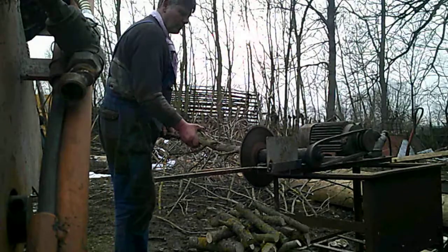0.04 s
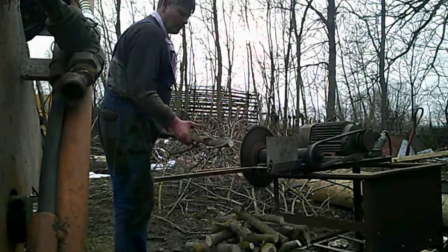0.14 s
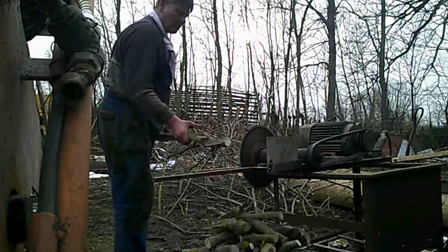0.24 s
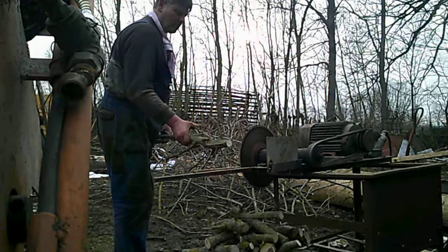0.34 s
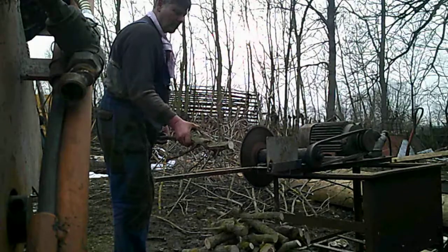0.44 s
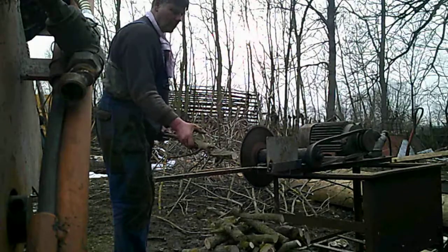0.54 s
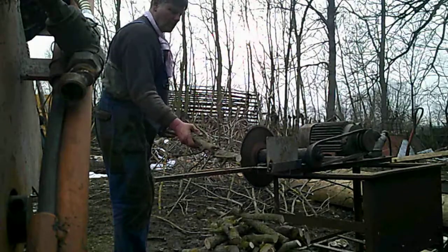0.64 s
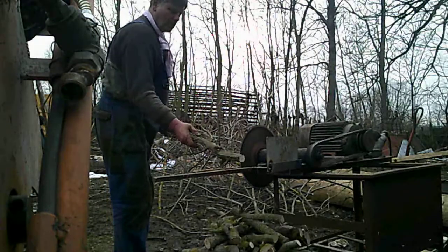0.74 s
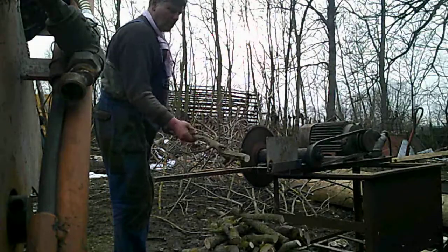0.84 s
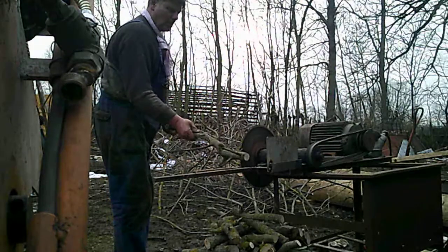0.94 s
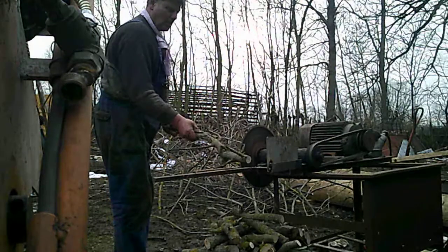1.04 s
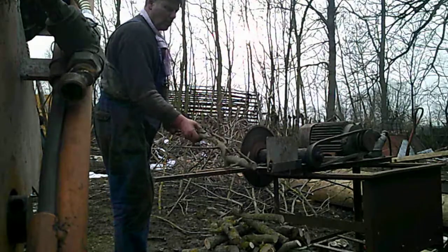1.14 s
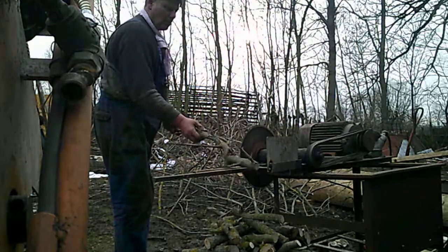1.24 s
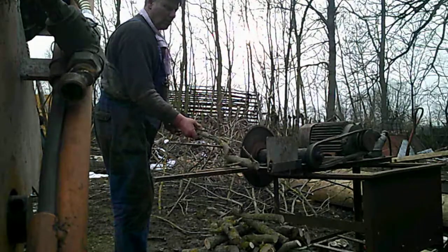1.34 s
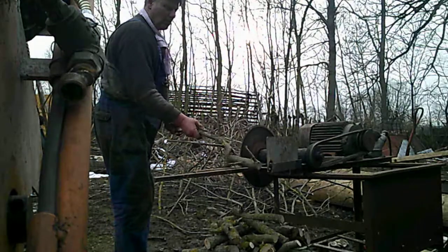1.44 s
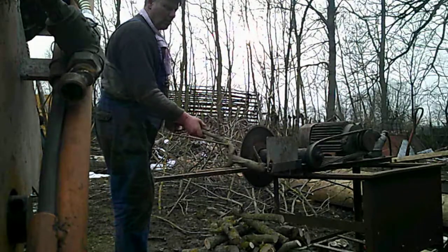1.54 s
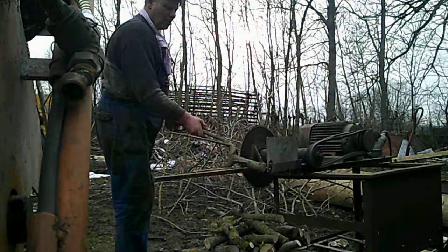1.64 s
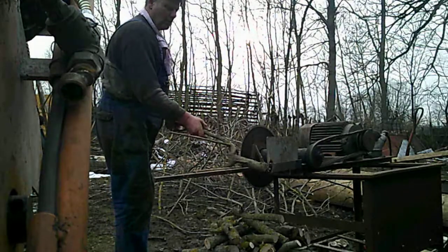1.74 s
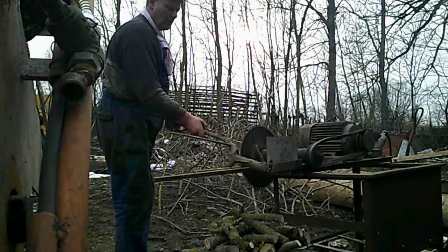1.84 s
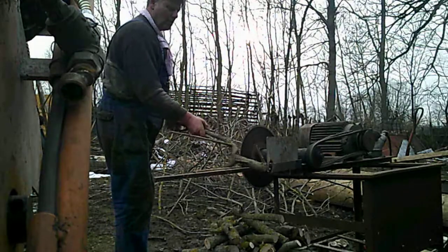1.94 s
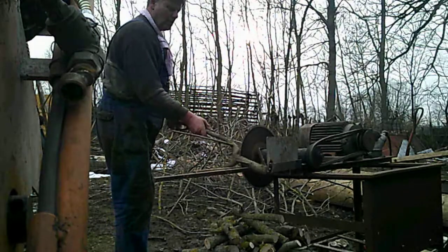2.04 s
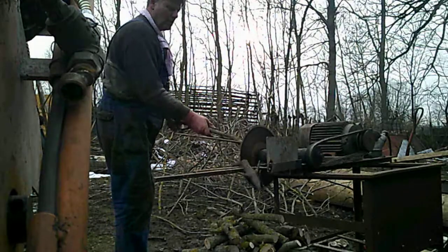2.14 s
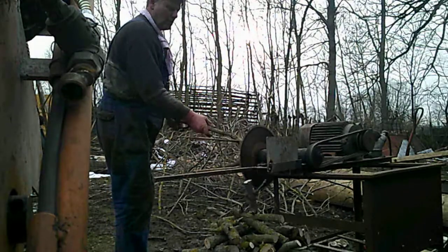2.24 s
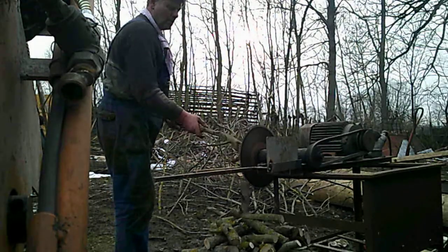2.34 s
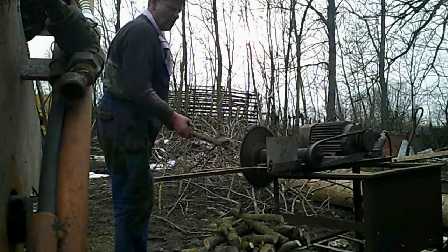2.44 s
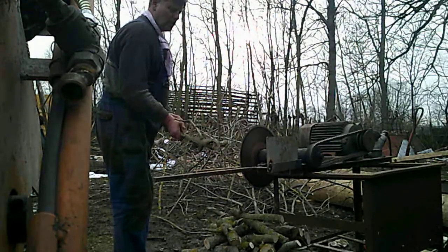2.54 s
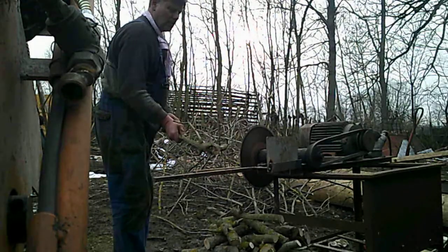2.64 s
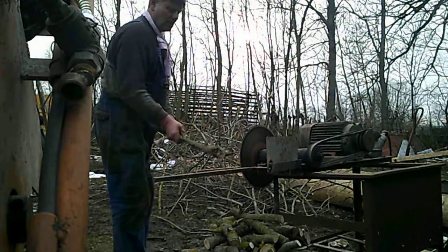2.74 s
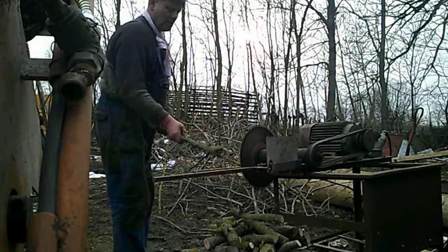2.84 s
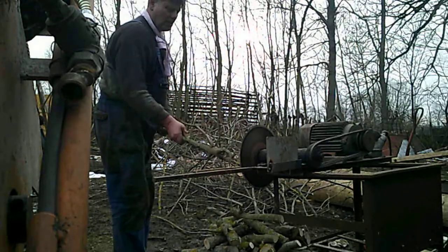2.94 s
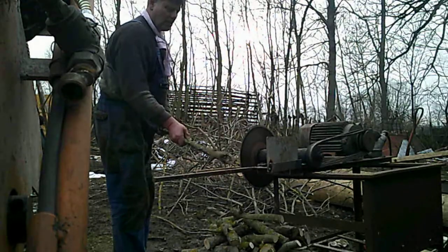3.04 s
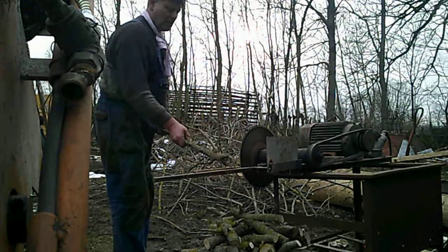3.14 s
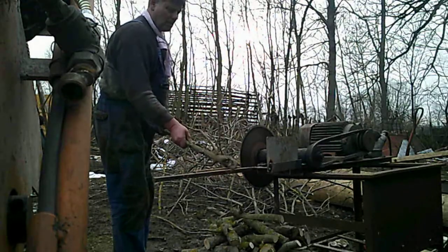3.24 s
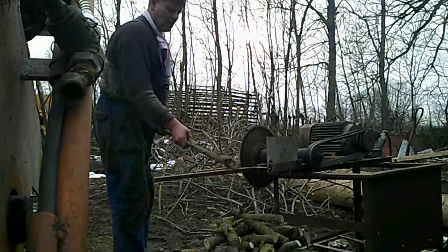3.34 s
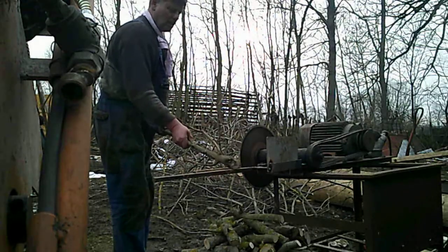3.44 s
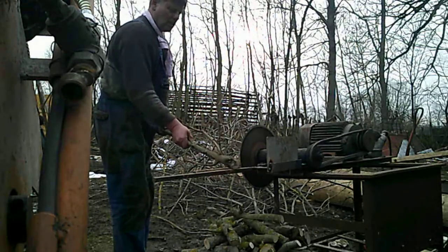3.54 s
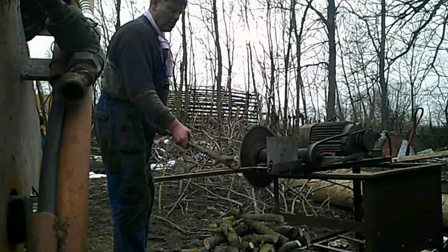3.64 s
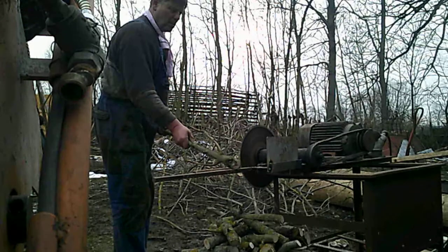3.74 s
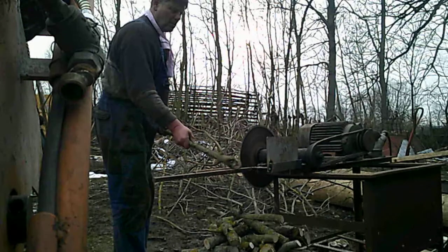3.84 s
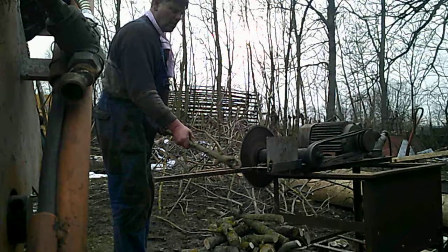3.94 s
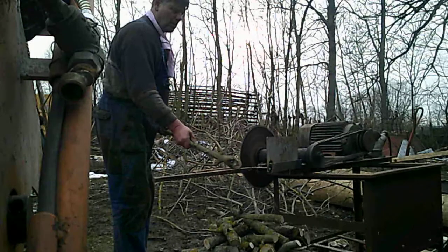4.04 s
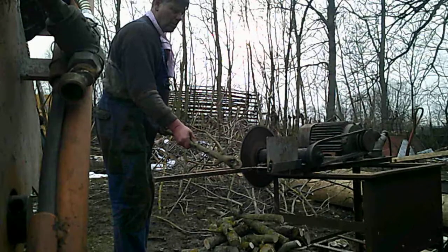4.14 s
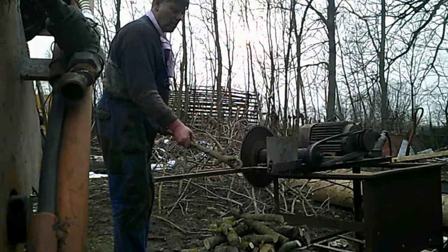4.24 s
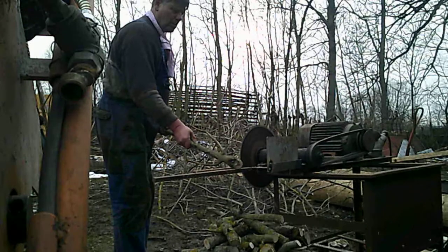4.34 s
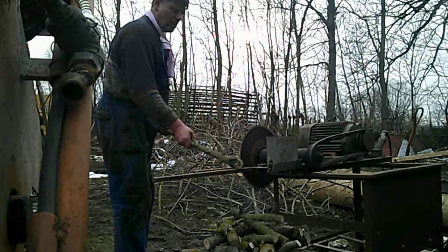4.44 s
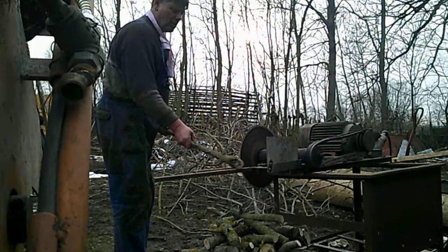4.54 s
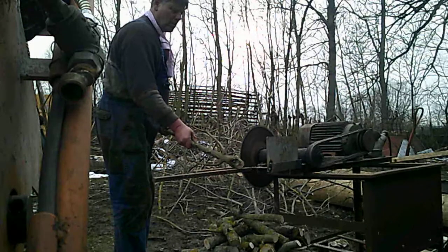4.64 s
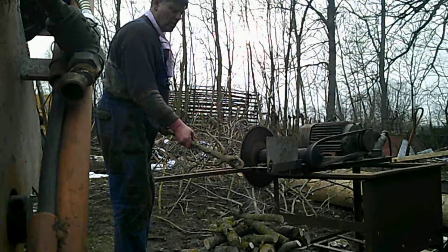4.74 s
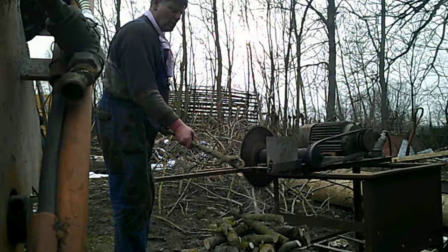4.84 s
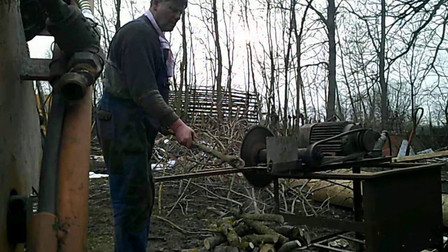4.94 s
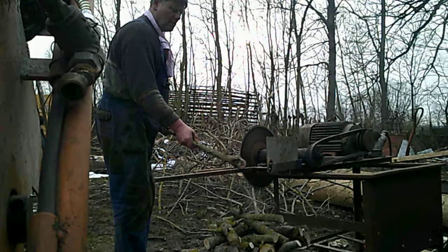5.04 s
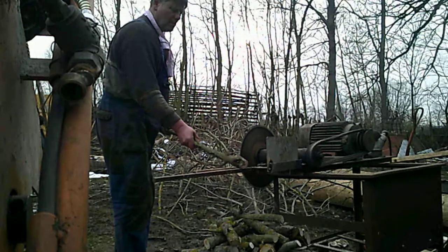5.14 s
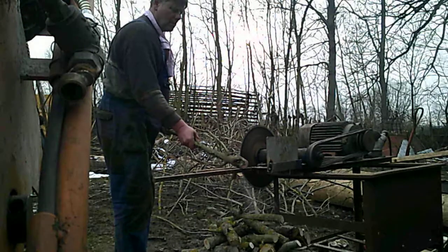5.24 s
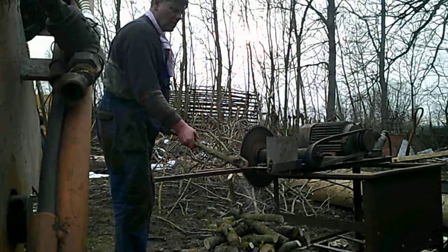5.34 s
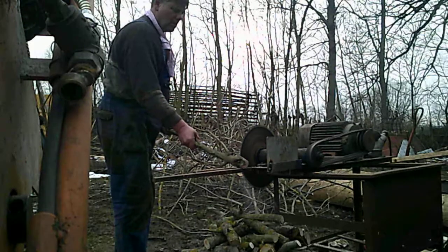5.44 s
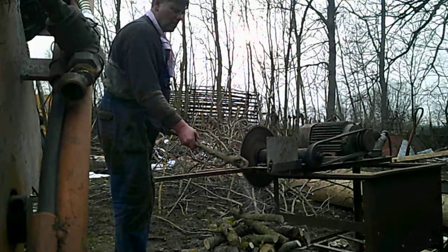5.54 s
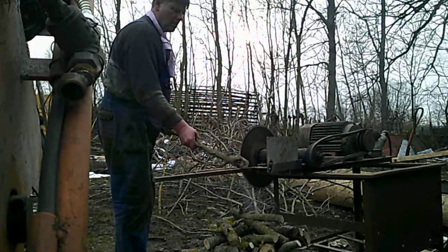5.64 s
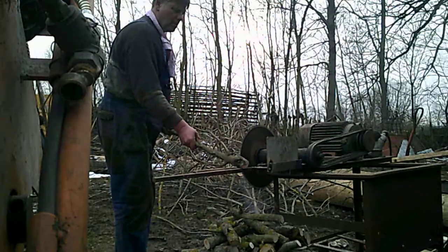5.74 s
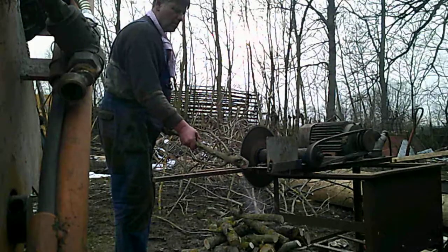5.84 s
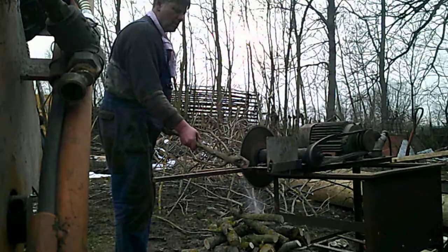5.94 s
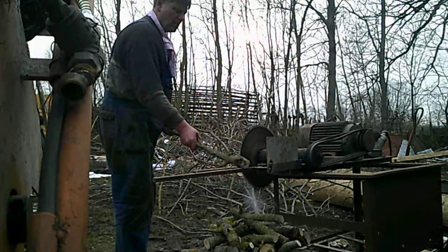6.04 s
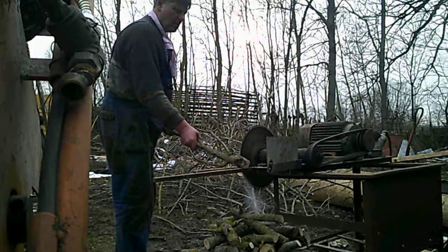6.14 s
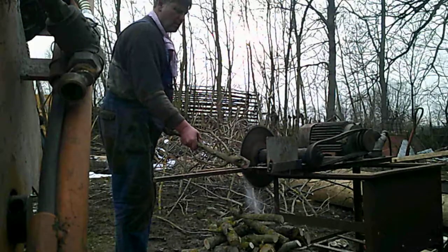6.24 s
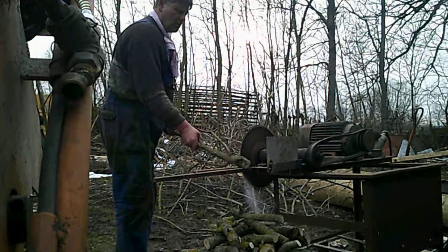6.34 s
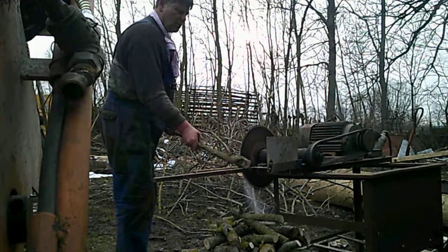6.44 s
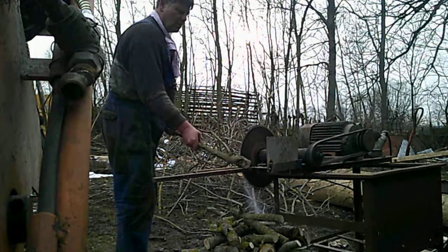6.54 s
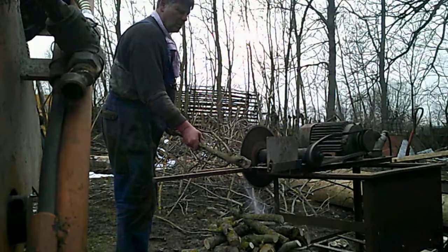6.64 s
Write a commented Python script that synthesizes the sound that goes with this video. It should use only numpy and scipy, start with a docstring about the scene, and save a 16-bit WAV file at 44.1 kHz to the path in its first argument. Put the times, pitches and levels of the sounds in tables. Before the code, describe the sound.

Outdoors, heard from a fixed spot nearby, a motor-driven saw blade spins with an airy whir above a soft rumble. A short cut through a thin branch gives a hollow tearing groan and a shriek, leaving a fading metallic ring. A second, much longer cut follows in thicker wood, buzzing and screeching in surges, with a thrumming steel bench and a fine rasp of chips, and is still going at the end.

```python
"""A homemade circular saw on an electric motor whirs in a yard, over a low outdoor rumble.
At 1.4 s it bites briefly into a thin branch, which groans: the uneven teeth strike the wood in a
pattern that repeats every turn, the blade screeches and the load slows the shaft a little.
The steel rings on over the whir. From 3.3 s to the end it works through a thick branch,
which damps the ring more and more as the blade sinks in."""
import sys
import numpy as np
from scipy import signal
from scipy.fft import rfft, irfft, next_fast_len
from scipy.io import wavfile
from scipy.ndimage import uniform_filter1d, map_coordinates

SR = 44100
rng = np.random.default_rng(int(sys.argv[2]) if len(sys.argv) > 2 else 0)


def output_pcm(signal):
    """Save a mono or channel-first signal as 16-bit PCM at the path in sys.argv[1].

    Samples are clipped to [-1, 1] before scaling.
    """
    pcm = np.clip(np.atleast_2d(signal).T, -1, 1) * 32767
    wavfile.write(sys.argv[1], SR, np.round(pcm).astype(np.int16))


N = 294347
T = np.arange(N) / SR

# tone of the yard's low bed: (frequency [Hz], relative level [dB])
RUMBLE_EQ = [(12, -15.5), (21, 4.5), (29, -0.5), (40, -11.5), (60, -8.5), (100, -16), (170, -18.5),
             (280, -30), (600, -44), (1500, -93.5)]
# tone of the air rushing past the teeth: (frequency [Hz], relative level [dB])
AIR_EQ = [(200, -19.5), (330, -17.5), (600, -14.5), (740, -11.5), (870, -3.5), (1150, -3), (1500, 0),
          (1800, -4.5), (2450, -22.5), (2670, -14), (2950, -15), (3300, -28), (3800, -34.5), (4250, -59)]
# narrow whistles of the running blade and motor: (frequency [Hz], width [Hz], relative level [dB])
WHINE_MODES = [(307, 10, -19), (438, 12, -9), (873, 18, -6), (985, 12, 3), (1105, 16, -4), (1217, 5, -1),
               (1341, 12, -3), (1431, 8, -1), (1500, 60, -5), (1662, 25, -10), (1946, 28, -6),
               (2062, 20, -15), (2186, 20, -12), (2358, 7, 1), (2406, 4, -3), (2460, 45, -14)]
# fader ride on the whir: (time [s], gain [dB])
WHIR_FADER = [(0, -41), (.35, -44.5), (1.35, -44.5), (2.5, -42.5), (3.2, -44), (6.67, -41.5)]
# shaft speed, sagging under load: (time [s], speed [turns/s])
SHAFT_SPEED = [(1.4, 29.65), (1.65, 29.24), (1.8, 29.22), (1.95, 28.91), (2.6, 29.65), (3.45, 29.64),
               (3.8, 29.45), (4.95, 29.38), (5.15, 29.25), (5.65, 29.23), (5.9, 28.94), (6.1, 28.91),
               (6.67, 28.45)]

# hollow tone of the wood: (frequency [Hz], width [Hz], relative level [dB])
WOOD_MODES = [(675, 46, -12.5), (836, 16, 0), (1020, 130, -4.5), (1266, 140, 3), (1307, 45, 12.5)]
# a branch hums when it bears firmly on the rim:
# (time [s], half length [s], multiple of shaft speed [x], level [dB])
WOOD_HUMS = [(1.494, 0.046, 8, -55.5), (1.865, 0.055, 8, -61), (3.57, 0.055, 15, -50.5),
             (3.702, 0.23, 8, -66), (4.97, 0.065, 8, -67.5), (5.85, .45, 8, -59), (6.096, 0.075, 15, -48),
             (6.148, .2, 22, -57), (6.58, 0.13, 11, -60)]
# tail length of the blade's dense, weak modes: (frequency [Hz], t60 [s])
SHIMMER_DECAY = [(400, .5), (1300, 0.92), (3000, 0.59), (3900, 0.89), (4600, 0.33), (5300, .42),
                 (6300, 0.51), (6800, 0.4), (7500, .25)]
# ring of the free blade: (frequency [Hz], relative level [dB], t60 [s])
RING_MODES = [(1136, -8, 1), (1157, -10, 1.5), (1194, -10, 1.2), (1217, 0, 2.8), (1324, -4, 1.6),
              (1443, -5, 2.4), (1602, -11, 1.8), (1900, -7, 2.2), (1954, -12, 1.8), (2051, -17, 2),
              (2358, 0, 2.8), (2406, -3, 2.5), (2476, -14, 1.6), (2893, -16, 1.2), (2950, -13, 1.1),
              (2972, -16, 1.1), (3268, -26, 1.3), (3424, -30, 1.3), (3833, -36, 1.3), (4012, -39, 1.2),
              (5570, -54, 1.6), (5880, -55, 1.5), (6280, -54, 1.6)]
# squeals of single blade modes: (time [s], half length [s], frequency [Hz], level [dB])
SQUEALS = [(1.505, 0.034, 2950, -37.5), (1.52, 0.04, 2400, -42), (3.686, 0.099, 2950, -43),
           (3.757, 0.065, 2360, -38.5), (5.134, 0.085, 2950, -45.5), (6.445, 0.076, 2405, -42.5)]

# mix of each cut at a normal bite: (start [s], end [s], screech gain [dB], shriek gain [dB],
# bench thrum gain [dB], chip rasp gain [dB], hollow wood gain [dB], tearing share [0-1])
CUT_MIX = [(1.409, 2.045, -38, -43.5, -48.5, -63, -40, 0.51),
           (3.298, 6.8, -42, -46.5, -48.5, -68.5, -55, 0.11)]
# how hard the wood is fed and the teeth scrape, a list per cut: (time [s], bite [dB], extra treble [dB])
FEED_RIDES = [
    [(1.4, -46, -4), (1.475, -26.5, 2.5), (1.57, -30.5, -1), (1.68, -38.5, 3), (1.79, -35.5, -5),
     (1.88, -37, 2), (1.975, -25.5, 5), (2.015, -21.5, -3.5), (2.06, -29, -12)],
    [(3.28, -39, -4.5), (3.34, -34, -0.5), (3.48, -37, 0), (3.68, -31.5, 1.5), (3.88, -36.5, 1.5),
     (4.03, -38.5, -0.5), (4.55, -34.5, -0.5), (4.83, -32.5, -0.5), (5.06, -33, -1.5), (5.12, -27.5, .5),
     (5.18, -32.5, 3.5), (5.36, -25, -1), (5.65, -32, 2.5), (5.8, -30.5, 0), (6.08, -38.5, 1.5),
     (6.27, -30.5, -4), (6.5, -37, 4), (6.67, -30.5, 2.5)],
]
# fibres tear more as the teeth start a fresh groove: (time [s], added tearing share [0-1])
FRESH_GROOVES = [(3.28, 0.3), (5.098, .3)]
# thrum of the steel bench: (frequency [Hz], width [Hz], relative level [dB])
BENCH_MODES = [(438.7, 18.2, -0.5), (473.7, 13, -2.5), (542, 19, -8), (669, 21, -7), (702, 36, -18),
               (789, 43, -9)]
# the wood-damped blade, from its low body through screech and shrill rim to its thinnest whistles,
# each: (frequency [Hz], width [Hz], relative level [dB])
BODY_MODES = [(860, 70, -20), (985, 30, -13), (1141, 22, -8), (1224, 35, -1), (1320, 40, 2), (1435, 22, 3),
              (1496, 25, -10), (1581, 20, 0), (1655, 25, -12)]
SCREECH_MODES = [(1897.4, 24, 0.5), (1966, 64, -1.5), (2088, 34, -5), (2158, 33, -10.5), (2367, 48, -6),
                 (2410, 22, 2.5), (2473, 58, -2), (2650, 120, -7.5), (2795, 170, -19)]
SHRIEK_MODES = [(2800, 70, -8), (2891, 35, -2), (2952, 40, 0), (3050, 70, -7), (3150, 90, -14),
                (3270, 70, -19), (3420, 22, -10), (3560, 110, -21), (3833, 16, -15), (3908, 16, -16),
                (4005, 25, -20)]
WHISTLE_MODES = [(4270, 22, -6.5), (4600, 39, -3), (5430, 52, -2), (5940, 190, -2.5), (6690, 50, -4),
                 (7500, 120, -0.5)]
# rasp of the flying chips: (frequency [Hz], relative level [dB])
CHIP_EQ = [(2500, -37), (3500, 1.5), (4000, -3), (4150, -4.5), (4900, -3.5), (5300, 3.5), (5950, 3.5),
           (6200, -2), (7150, 0.5), (7520, 6.5), (7850, -3.5), (8150, -6.5), (8550, -7), (8950, -33)]

GROAN_S, GROAN_WIDTH_S, GROAN_DB = 1.63, .075, -49.5
GROAN_HZ, GROAN_FALL_HZ_PER_S = 419, 335
RING_DB, BURIED_S, DAMPING_DB_PER_S = -10, 3.6, 5  # ring gain against the bite, and its late fade
NORMAL_BITE_DB = -33
ATTACK_S, RELEASE_S, GROOVE_SETTLE_S = 0.021, 0.041, 0.32
TREBLE_SLOPE, THRUM_SLOPE = 0.61, .1  # dB per dB of bite
SHRIEK_SLOPE, RASP_SLOPE = 0.94, 0.87  # dB per dB of screech
HIGH_CUT_HZ = 8950


def amp(db):
    """Decibels to gain."""
    return 10 ** (np.asarray(db) / 20)


def unit(x):
    """Scale to rms 1."""
    return x / np.sqrt(np.mean(x ** 2) + 1e-20)


def curves(rows):
    """An automation curve for each column after the time."""
    times, *columns = np.transpose(rows)
    return [np.interp(T, times, column) for column in columns]


def wobble(rate):
    """Smooth random modulation, rate knots a second."""
    return map_coordinates(rng.standard_normal(2048), [T * rate], mode="mirror")


def swell(peak_s, width_s):
    """A bell-shaped envelope peaking at 1."""
    return np.exp(-.5 * ((T - peak_s) / width_s) ** 2)


def filtered(x, response):
    """x through a complex frequency response."""
    size = next_fast_len(N + SR // 2)
    return irfft(rfft(x, size) * response(np.fft.rfftfreq(size, 1 / SR)), size)[:N]


def coloured(x, eq):
    """x through an EQ curve, at rms 1."""
    hz, db = np.transpose(eq)
    return unit(filtered(x, lambda f: amp(np.interp(np.log(f + 1), np.log(hz), db))))


def resonated(x, modes, low_hz, high_hz):
    """x through a resonator bank and a band-pass, at rms 1."""
    def response(f):
        peaks = sum((-1) ** k * amp(db) * 1j * f * width / (hz * hz - f * f + 1j * f * width)
                    for k, (hz, width, db) in enumerate(modes))
        return peaks / np.sqrt((1 + (low_hz / (f + 1)) ** 12) * (1 + (f / high_hz) ** 40))
    return unit(filtered(x, response))


def yard_rumble():
    """A low, gently heaving outdoor bed."""
    return amp(-49.5 + 1.7 * wobble(3.2)) * coloured(rng.standard_normal(N), RUMBLE_EQ)


def blade_whir(turns):
    """Air rushes past the teeth, pulsing once a turn, and sets off narrow whistles."""
    fader_db, = curves(WHIR_FADER)
    air_db = -2.5 + 0.27 * np.sin(2 * np.pi * turns) + 0.23 * wobble(1.7)
    air = amp(air_db) * coloured(rng.standard_normal(N), AIR_EQ)
    whine = amp(-0.5) * resonated(rng.standard_normal(N), WHINE_MODES, 270, 2800)
    return amp(fader_db) * (air + whine)


def branch_voice(turns, hollow):
    """The wood tears hollowly and hums with the shaft; the first branch groans lower as its kerf grows."""
    groan_hz = GROAN_HZ - GROAN_FALL_HZ_PER_S * (T - GROAN_S)
    phase = 2 * np.pi * np.cumsum(groan_hz) / SR
    rough_tone = wobble(45) * np.sin(phase) + wobble(44.9) * np.cos(phase)
    groan = amp(GROAN_DB) * swell(GROAN_S, GROAN_WIDTH_S) * rough_tone
    tear = hollow * resonated(rng.standard_normal(N), WOOD_MODES, 550, 1257)
    tremble = 0.16 * wobble(10)
    hum = sum(amp(db) * swell(s, width_s) * unit(np.sin(2 * np.pi * multiple * turns + tremble))
              for s, width_s, multiple, db in WOOD_HUMS)
    return groan + tear + amp(wobble(7.4)) * hum


def blade_shimmer(cut, wet_db):
    """Countless weak blade modes put a short metallic tail on the cut."""
    hz, t, noise = signal.stft(rng.standard_normal(SR), SR, nperseg=256)
    t60 = np.interp(hz, *np.transpose(SHIMMER_DECAY))
    _, tail = signal.istft(noise * amp(-60 * t / t60[:, None]), SR, nperseg=256)
    return amp(wet_db) * signal.fftconvolve(cut, tail / np.linalg.norm(tail))[:N]


def blade_ring(bite):
    """Each mode stores the cut's energy and lets it go slowly; deep in the thick branch, wood damps it."""
    damping_db = DAMPING_DB_PER_S * np.maximum(T - BURIED_S, 0)
    power = (bite * amp(RING_DB - damping_db)) ** 2
    ring = np.zeros(N)
    for hz, db, t60 in RING_MODES:
        feedback = amp(-120 / (t60 * SR))  # acts on power: 60 dB down in t60
        stored = signal.lfilter([1 - feedback], [1, -feedback], power)
        envelope = amp(db + wobble(8.2)) * np.sqrt(stored)
        ring += envelope * np.sin(2 * np.pi * hz * T + 0.57 * wobble(9))
    return ring


def blade_squeals(flutter_per_s):
    """Single blade modes flare into brief, unsteady squeals."""
    squeals = np.zeros(N)
    for s, width_s, hz, db in SQUEALS:
        tone = np.sin(2 * np.pi * hz * T + 0.79 * wobble(flutter_per_s))
        squeals += amp(db + 2.3 * wobble(flutter_per_s)) * swell(s, width_s) * unit(tone)
    return squeals


def wood_contact():
    """Layer envelopes and tearing share as wood meets rim: a hard bite lifts treble far more than thrum."""
    gains, tearing = 0, 0
    for mix, feed in zip(CUT_MIX, FEED_RIDES):
        start, end, screech_db, shriek_db, thrum_db, rasp_db, hollow_db, torn = mix
        bite_db, extra_db = curves(feed)
        push_db = bite_db - NORMAL_BITE_DB
        treble_db = TREBLE_SLOPE * push_db + extra_db
        attack = np.clip((T - start) / ATTACK_S + 1, 0, 1)
        release = np.clip((end - T) / RELEASE_S + 1, 0, 1)
        gate = attack * release
        gains += gate * amp([bite_db, screech_db + treble_db, shriek_db + SHRIEK_SLOPE * treble_db,
                             thrum_db + THRUM_SLOPE * push_db, rasp_db + RASP_SLOPE * treble_db,
                             hollow_db + THRUM_SLOPE * push_db])
        tearing += torn * gate
    for s, share in FRESH_GROOVES:
        tearing += share * (T > s) * np.exp(-np.abs(T - s) / GROOVE_SETTLE_S)
    return (*gains, tearing)


def tooth_force(turns, drift, tearing, patchy_db, size=4096):
    """Uneven teeth buzz in a slowly morphing one-turn loop, blended with the noise of tearing fibres."""
    steps, field = rng.standard_normal((2, 64, size // 8))
    phase = np.cumsum(drift * steps, axis=0) + rng.uniform(0, 2 * np.pi, size // 8)
    patches = uniform_filter1d(uniform_filter1d(field, size=4, axis=0), size=5, axis=1)
    harmonics = amp(patchy_db * unit(patches))  # neighbours swell and fade together
    loops = irfft(harmonics * np.exp(1j * phase), size)  # a row every four turns
    buzz = map_coordinates(loops, [turns / 4, turns % 1 * size], order=1, mode="grid-wrap")
    share = np.clip(tearing, 0, 1)
    return np.sqrt(1 - share) * unit(buzz) + np.sqrt(share) * rng.standard_normal(N)


def saw_cut(turns, bite, screech, shriek, thrum, rasp, tearing):
    """The lead sound: the teeth drive blade and bench and fling a spray of chips."""
    # the shaft flutters slightly, so the teeth meet the wood a little early or late
    contact_turns = turns + .0007 * wobble(11)
    steady_force = tooth_force(contact_turns, drift=.2, tearing=tearing, patchy_db=1.3)
    rough_force = tooth_force(contact_turns, drift=.33, tearing=1.6 * tearing, patchy_db=2)
    body = amp(-2.02 + 1.1 * wobble(22)) * bite * resonated(steady_force, BODY_MODES, 800, 2600)
    edge = amp(-2) * screech * resonated(rough_force, SCREECH_MODES, 1750, 2920)
    rim = amp(-1.3) * shriek * resonated(rough_force, SHRIEK_MODES, 2700, 3980)
    bench = amp(-0.42 + 1.3 * wobble(6.2)) * thrum * resonated(steady_force, BENCH_MODES, 260, 900)
    runout_db = .4 * np.sin(2 * np.pi * turns)  # the rim runs slightly out of true
    spray = unit(amp(runout_db + 2 * wobble(170) + 1.2 * wobble(30)))
    chip_force = tooth_force(turns, drift=.35, tearing=0.33, patchy_db=1.5)
    chips = amp(-0.3) * rasp * coloured(spray * chip_force, CHIP_EQ)
    whistles = amp(-5) * rasp * resonated(rough_force, WHISTLE_MODES, 4100, 7500)
    return body + edge + rim + bench + chips + whistles


def scene():
    """Mono mix of yard and saw, with whir, hums and teeth locked to one shaft."""
    turns = np.cumsum(curves(SHAFT_SPEED)[0]) / SR
    bite, screech, shriek, thrum, rasp, hollow, tearing = wood_contact()
    cut = saw_cut(turns, bite, screech, shriek, thrum, rasp, tearing)
    tails = blade_shimmer(cut, wet_db=-7.5) + blade_ring(bite)
    backing = blade_whir(turns) + branch_voice(turns, hollow) + yard_rumble()
    return (backing + tails + blade_squeals(flutter_per_s=35) + cut)[None]


def record(dry):
    """A brick-wall high cut on the whole mix."""
    return filtered(dry[0], lambda hz: hz < HIGH_CUT_HZ)[None]


dry = scene()
out = record(dry)
output_pcm(out)
```